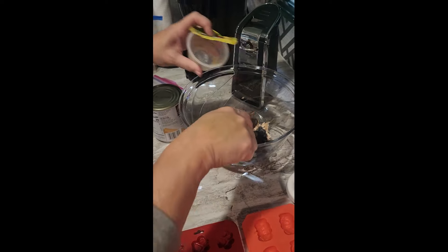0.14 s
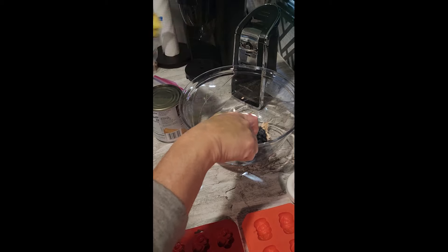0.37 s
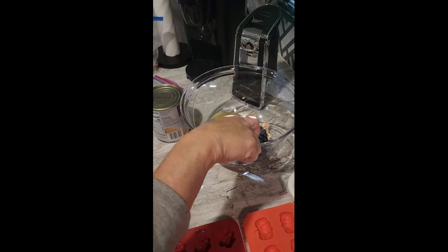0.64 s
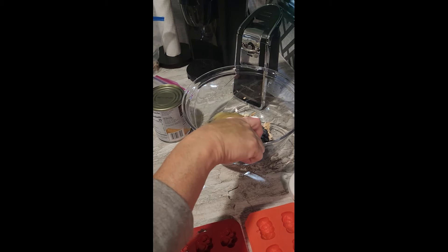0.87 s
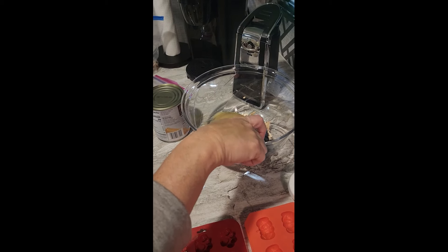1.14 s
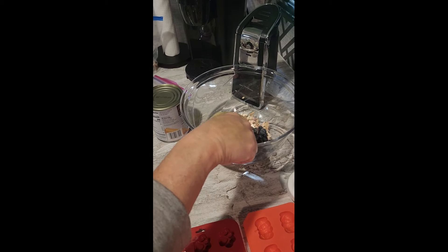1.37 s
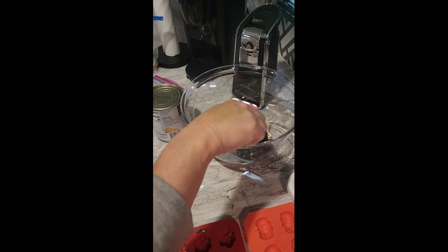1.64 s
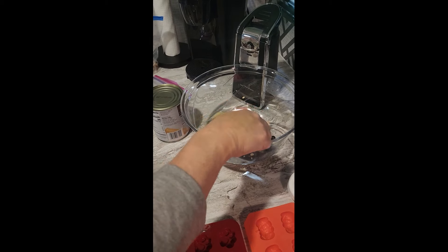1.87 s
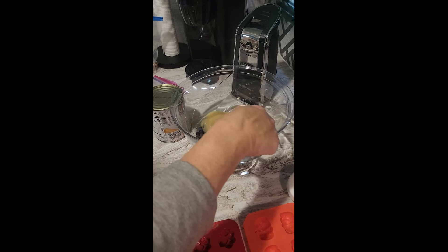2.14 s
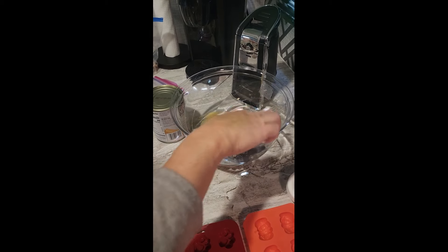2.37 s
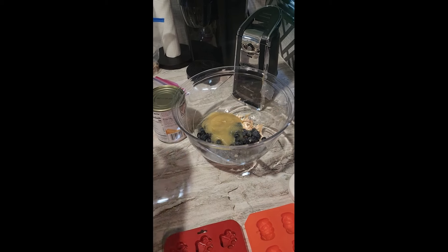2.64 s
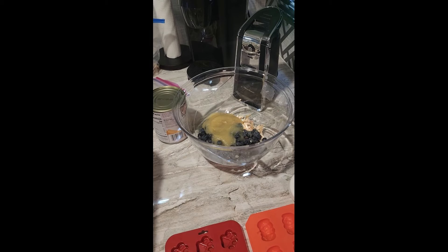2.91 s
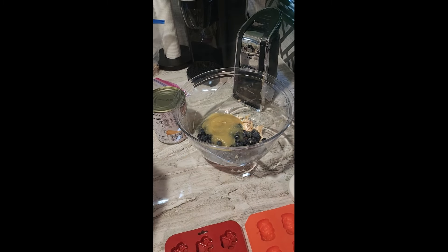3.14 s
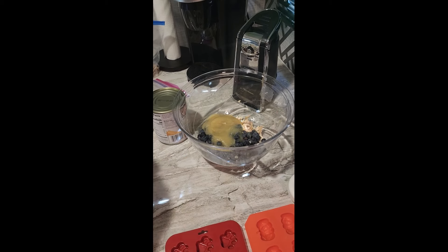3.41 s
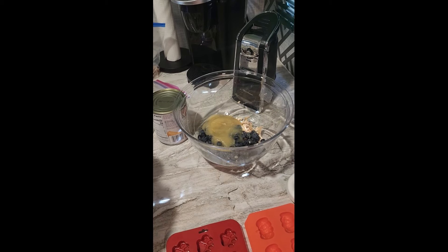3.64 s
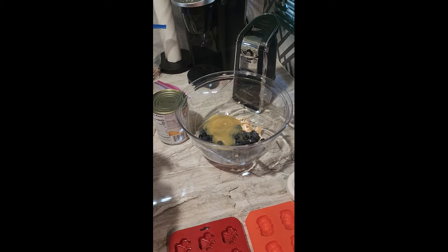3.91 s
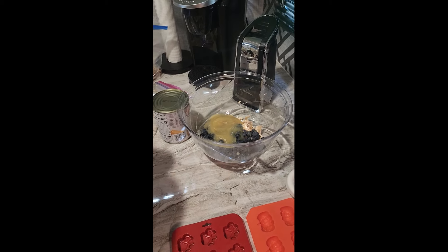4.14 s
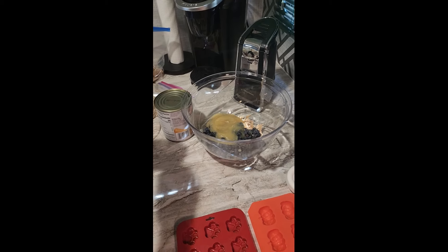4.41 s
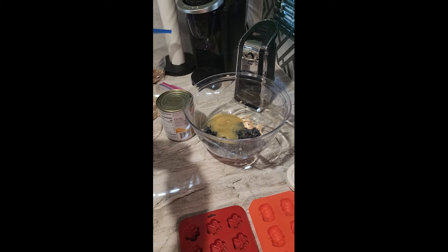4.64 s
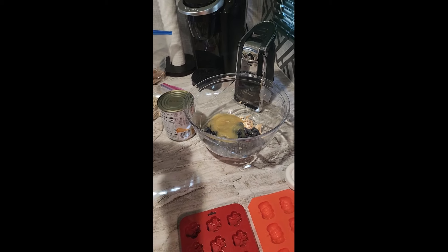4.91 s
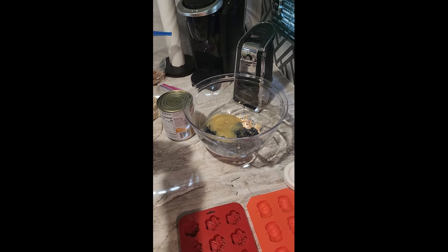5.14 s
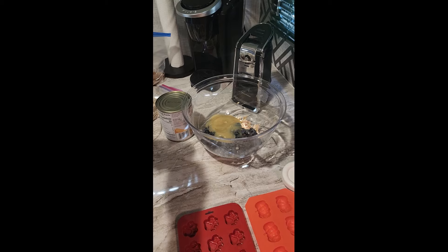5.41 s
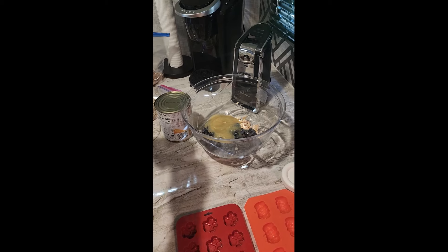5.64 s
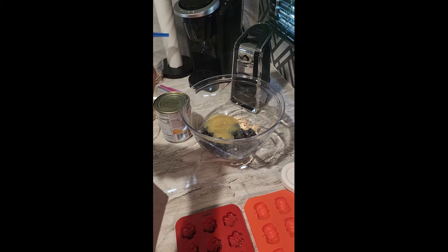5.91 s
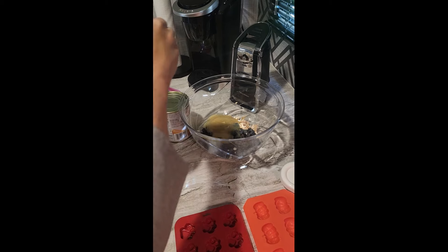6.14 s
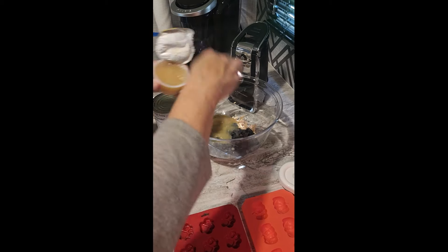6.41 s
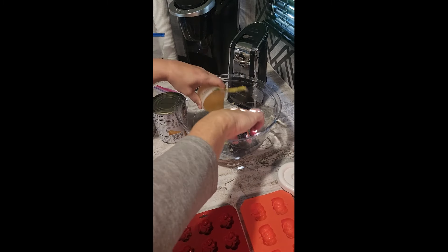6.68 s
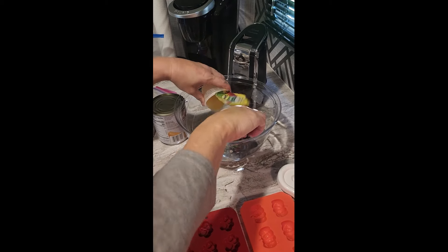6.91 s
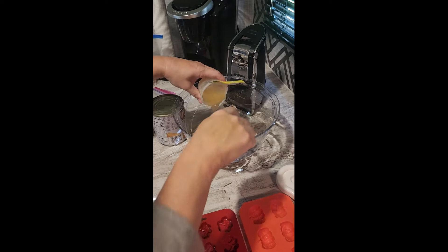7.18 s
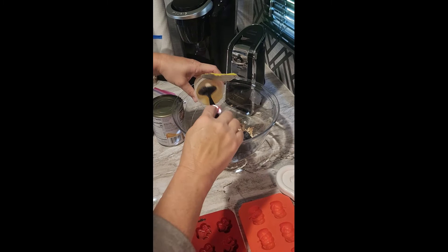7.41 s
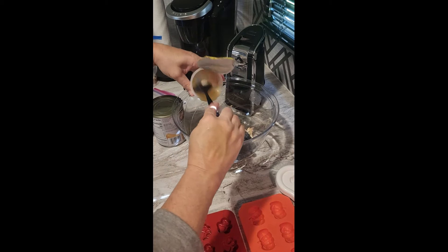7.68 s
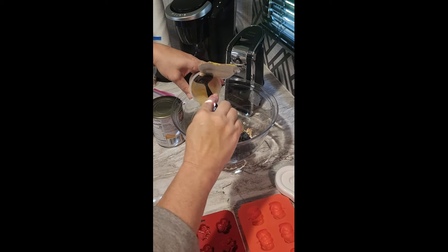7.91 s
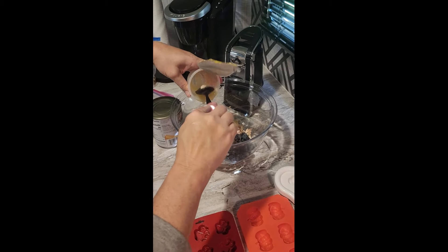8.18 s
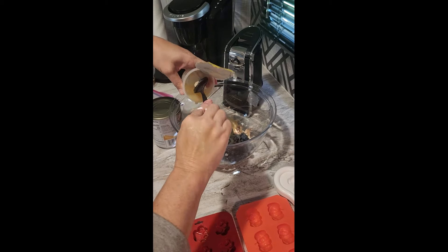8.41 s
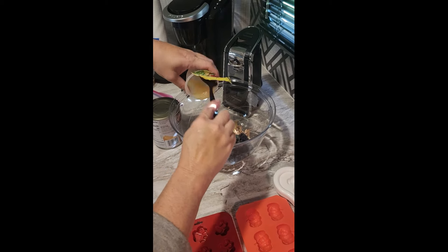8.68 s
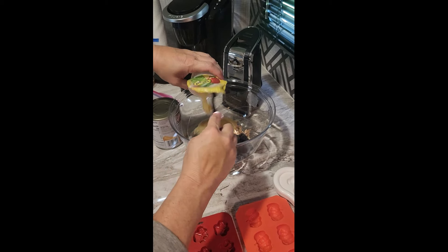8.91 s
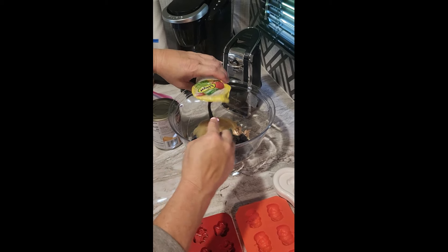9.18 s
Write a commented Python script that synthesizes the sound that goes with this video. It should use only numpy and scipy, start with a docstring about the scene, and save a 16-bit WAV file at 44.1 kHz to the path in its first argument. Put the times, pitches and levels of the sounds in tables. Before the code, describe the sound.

Close, dry kitchen sound from a phone on the counter side. A light plastic cup is knocked and shoved, with clustered rattles, then bumps and rubs before a loud, sharp, ringing drop. Several nearly quiet seconds follow over a faint refrigerator drone. Thin foil ticks and crinkles, peels with small snaps, and a spoon then taps and scrapes a hollow little cup until the end.

```python
"""Cup, foil and spoon in a quiet kitchen

A phone hears an empty plastic cup shoved about and dropped among other things (force bursts and rough
swells of noise exciting resonant bodies); the foil lid of a second cup crinkles and peels, then a spoon
knocks on that cup and scrapes it out, its air singing. Damped sines add short single notes and a ringing
blow. A refrigerator drones as shaped noise; hard walls answer quickly with decaying noise echoes."""
import sys
import numpy as np
from scipy import signal
from scipy.fft import rfft, irfft, next_fast_len
from scipy.io import wavfile
from scipy.ndimage import uniform_filter1d, map_coordinates

SR = 44100
rng = np.random.default_rng(int(sys.argv[2]) if len(sys.argv) > 2 else 0)


def invert_db(level):
    """Linear amplitude ratio for a level in decibels (20 dB per decade), elementwise."""
    return 10 ** (np.asarray(level, dtype=float) / 20)


def bounce(signal):
    """Save signal as a 16-bit WAV file at the path given by the first command-line argument."""
    frames = np.transpose(np.atleast_2d(signal))
    limited = np.clip(frames, -1, 1)
    pcm = np.round(limited * 32767).astype(np.int16)
    wavfile.write(sys.argv[1], SR, pcm)


N = 410130  # length [samples]

# Knocks, before trims: (time [s], click level [dB], weight: thud re click [dB], snap re click [dB],
# rattling note [Hz])
CLATTER_KNOCKS = [(0.275, -59.5, 3, -30, 1270), (0.3056, -55, 4, -10, 1460), (0.3736, -36, -4.5, -5, 990),
                  (0.4027, -36.5, -12, -28, 830), (0.418, -27, -14.5, -15, 974),
                  (0.4428, -23.5, -13, -16.5, 511), (0.4934, -25, -10.5, -23.5, 626),
                  (0.5149, -26.5, -13.5, -18.5, 1644), (0.5586, -37.5, -7, -12.5, 905),
                  (0.5765, -26.5, -13, -12, 680), (0.607, -42.5, -2.5, -6.5, 496),
                  (0.636, -27, -14, -6, 598), (0.8994, -34.5, -36, 2, 1317), (1.1319, -41, -1.5, -3, 543),
                  (1.1744, -49.5, -3.5, -17, 585), (1.2044, -40, -3.5, -12, 540),
                  (1.2344, -44, -1, -9.5, 560), (1.257, -32, -4, -16, 916), (1.5201, -21, -3, -22.5, 982),
                  (1.5724, -45.5, 15, -3.5, 1196), (1.5969, -41, 1.5, -19, 1250),
                  (1.8796, -21, -12.5, -33, 2286), (1.9754, -27.5, -26, -43, 2296),
                  (2.2263, -23, -7, -10, 2344), (2.3222, -14.5, -8, -16, 1580),
                  (2.4115, -7, -11.5, -12.5, 1906), (2.423, -5, -16.5, -12, 1113)]
# Knocks of the foil lid: (time [s], click level [dB], weight [dB], snap [dB], rattling note [Hz])
FOIL_KNOCKS = [(2.7801, -65.5, 1.5, -2.5, 2260), (3.1999, -70, -5.5, 6, 7390), (3.2594, -76, 1.5, 14, 7600),
               (3.3792, -68, -15, 9, 6640), (4.5998, -65, -2, -5, 6620), (4.7398, -50.5, -15, -24, 3240),
               (4.9294, -60.5, -8, -2, 2200), (5.0694, -66.5, -1, -10.5, 3450),
               (5.2235, -47, -10, -22, 2280), (5.3577, -50, -5, -23, 2630), (5.4798, -53, -11, -17.5, 2410),
               (5.4993, -52, -9.5, -10, 2370), (5.6014, -56, -11, -11.5, 2400),
               (5.6306, -56, -6, -22.5, 2370), (5.803, -38.5, -30, -26, 2420), (6.4115, -48, -2, -5, 2980),
               (6.8137, -36, -22, 5, 6450), (6.869, -59, 2, -9, 6400), (6.9148, -54.5, -2, -7, 2250),
               (7.0344, -30.5, -15, -17.5, 3110), (7.1187, -46.5, -15, -19.5, 2140),
               (7.2555, -49.5, 0, -22, 2124)]
# Knocks of the spoon: (time [s], click level [dB], weight [dB], snap [dB], rattling note [Hz])
SPOON_KNOCKS = [(7.5504, -26.5, -26.5, -7.5, 1341), (7.5746, -43, -7, -4, 1330),
                (7.6531, -44.5, 0.5, -20, 635), (7.7353, -40, -12.5, -13, 1360),
                (7.8142, -39.5, -19, -6, 1585), (7.9487, -24, -24.5, -1, 1305),
                (7.9727, -31.5, -14, -18, 1380), (8.0617, -40.5, -23, -6.5, 3640),
                (8.3571, -40.5, -16, -4, 3060), (8.4141, -32, -18, -13, 1580),
                (8.4838, -37.5, -8.5, -7, 1290), (8.542, -41.5, -7.5, 0, 1350),
                (8.7186, -27.5, -20, 0, 1580), (8.751, -34.5, -15, -14, 1590), (8.8014, -50, 4, -8, 1630),
                (9.0507, -20, -21, -0.5, 3256), (9.0885, -34.5, -7, -4, 1476), (9.2123, -42.5, -6, 0, 1472)]
# Rubbing strokes and the rough tails of knocks: (time of peak [s], fade [s], body level [dB],
# weight: rumble re body [dB], grit: hiss re body [dB])
CLATTER_SWELLS = [(.41, 0.025, -39.5, -16, -10.5), (.455, 0.013, -47.5, 3, -6.5),
                  (.485, .012, -47.5, 2, -18), (.525, 0.016, -46, -7, -6.5), (.556, 0.0087, -42, -17, -8),
                  (.597, 0.026, -32, -9.5, -13), (.65, 0.0086, -43.5, 2.5, -5.5),
                  (.87, 0.017, -58, -15.5, -8), (.908, 0.046, -50.5, -18, -2.5),
                  (1.16, 0.02, -48.5, -10, -21), (1.205, 0.035, -47.5, -9, -17),
                  (1.25, 0.036, -45, -7, -31), (1.275, 0.0084, -38, -3.5, -36), (1.476, 0.017, -61, -9, 0),
                  (1.505, 0.0098, -49, 4.5, -18.5), (1.54, 0.0093, -28, -20, -26),
                  (1.572, 0.0099, -44.5, 8.5, -39), (1.602, 0.031, -46.5, -1.5, -17),
                  (1.9, .018, -58, 23, 4), (1.954, 0.014, -61.5, 24.5, 6), (1.99, 0.062, -54, 10, -7.5),
                  (2.075, 0.033, -41, 12, -15.5), (2.13, 0.043, -42, 9, -15), (2.18, 0.04, -45.5, 15, -12),
                  (2.24, 0.019, -35.5, 8, -11), (2.29, 0.034, -48.5, 12, -9), (2.34, 0.013, -38, 2.5, -11)]
# Strokes and rough tails of the foil: (time of peak [s], fade [s], body level [dB], weight [dB], grit [dB])
FOIL_SWELLS = [(.075, 0.031, -73.5, -3.5, 8.5), (3.2, 0.038, -85, 0, 11.5), (3.258, 0.0087, -78.5, 3, 22),
               (3.354, 0.018, -78, 3, 17), (3.86, 0.052, -73.5, 1.5, -1.5), (4.6, 0.019, -80.5, -8, 1),
               (4.93, .018, -73, -6, 3.5), (5.23, 0.018, -71, -4, -2), (5.5, 0.026, -70, -14, -3),
               (5.802, 0.0062, -52, -20, -9), (5.89, .03, -34.5, -18, -7.5), (6.105, 0.031, -67.5, -12, -4),
               (6.165, 0.018, -58.5, 4, -4), (6.2, 0.026, -49.5, 3.5, -1), (6.245, 0.026, -58.5, -18, -1),
               (6.418, .012, -49.5, -4.5, -11), (6.455, .015, -72, 5, 1), (6.832, 0.018, -60.5, -10, 12),
               (6.945, 0.016, -53.5, -6, -5.5), (7.062, 0.015, -61, -13, -5), (7.11, 0.046, -81.5, 27.5, 1),
               (7.255, 0.043, -74, 13.5, -6)]
# Strokes and rough tails of the spoon: (time of peak [s], fade [s], body level [dB], weight [dB], grit [dB])
SPOON_SWELLS = [(7.6, 0.055, -62.5, -16.5, 3), (7.665, 0.021, -56, 3.5, -13),
                (7.745, 0.011, -59, -7.5, -12), (7.762, 0.026, -61.5, -11, 11),
                (7.793, .02, -47.5, -17, -1.5), (7.823, 0.013, -49.5, -11, -4),
                (7.943, 0.0053, -55, -12, 6), (7.986, 0.021, -50, -12.5, 4.5),
                (8.085, 0.035, -67, -4.5, 8.5), (8.167, 0.0097, -53, -15, 12),
                (8.2, 0.014, -45.5, -8.5, 2.5), (8.37, .014, -60, -13, 4), (8.43, 0.029, -61, -6.5, -1),
                (8.462, 0.013, -66, -11, 8), (8.484, 0.018, -58, 4.5, 13.5), (8.555, 0.014, -45, -10, 1),
                (8.59, 0.0217, -55.5, -7, -1), (8.62, 0.012, -57.5, -6, 5.5),
                (8.77, 0.0055, -47, -21.5, -8), (8.806, 0.024, -47.5, -7, 0), (8.87, 0.061, -53, -4.5, 3.5),
                (8.922, 0.034, -49.5, -5, -6.5), (9.043, 0.0058, -46.5, -10, -4),
                (9.11, 0.0083, -50, -17, 7), (9.162, 0.019, -41, -17, 3), (9.224, 0.016, -47, -23, 1.5),
                (9.26, 0.037, -49.5, -18, 0)]
# Broad colour of the empty cup and what it meets: (frequency [Hz], relative level [dB])
CLATTER_COLOUR = [(29, -33), (50, 5.5), (203, -3), (271, 2), (380, -15), (507, -14.5), (1020, -13),
                  (1400, -15), (1870, -11), (4140, -19), (8970, -33.5), (12000, -29), (16000, -33)]
# Broad colour of the foil: (frequency [Hz], relative level [dB])
FOIL_COLOUR = [(59, -49), (100, -15.5), (461, -14), (558, -15.5), (768, -12), (1450, -14.5), (2270, -10),
               (7610, -18), (9210, -36.5), (11900, -19), (16000, -30.5)]
# Broad colour of spoon and cup: (frequency [Hz], relative level [dB])
SPOON_COLOUR = [(59, -34), (100, 2.5), (415, -8.5), (621, -8.5), (801, -15), (1520, -2), (1870, -7),
                (3320, -7.5), (4670, -12), (7610, -5), (9020, -23.5), (12400, -10.5), (16000, -23.5)]
# Resonances of the empty cup and what it meets: (frequency [Hz], width [Hz], level re colour [dB])
CLATTER_MODES = [(120, 13, 11), (302, 56, 5.5), (512, 29, 10), (700, 86, -2.5), (900, 68, 2.5),
                 (974, 13, 4), (1228.6, 110, 3.5), (1717, 21, 1.5), (1930, 21, -4), (2370, 130, 1.5),
                 (3756, 60, 9.5), (4160, 28, -1)]
# Resonances of the foil: (frequency [Hz], width [Hz], level re colour [dB])
FOIL_MODES = [(3376, 1000, 4.6), (6200, 250, 0.5)]
# Resonances of spoon and cup: (frequency [Hz], width [Hz], level re colour [dB])
SPOON_MODES = [(590, 70, 7), (1360, 90, 5), (1580, 207, 6.46), (3371, 86, 3.7), (3760, 170, 7),
               (5480, 59, 1.6), (6460, 140, 5), (8284, 150, 2.8), (12420, 400, 6.2)]
# Broad colour of the refrigerator: (frequency [Hz], relative level [dB])
DRONE = [(12, -58.5), (20, -26), (70, 1), (83, -6), (98, -25.5), (146, -13), (172, -37), (301, -26.5),
         (377, -33), (472, -29), (1370, -31.5), (1960, -25.5), (2320, -37), (7520, -49), (16000, -59)]
# Resonances of the refrigerator: (frequency [Hz], width [Hz], level re colour [dB])
DRONE_MODES = [(59, 90, -5.5), (69.6, 9.7, -1.5), (130, 23, 3), (320.4, 74, 5.5), (824, 79, 7),
               (2050, 430, 4), (7680, 1000, 8), (10400, 2400, -19), (11600, 2200, 11.5)]
# Left-right correlation of the drone: (frequency [Hz], correlation [-1 to 1])
ALIKE = [(60, 0.99), (180, 0.83), (550, 0.18), (1650, -0.18), (4970, 0.04), (15000, 0.87)]
# Decay of the kitchen's echoes: (frequency [Hz], t60 [s])
KITCHEN = [(100, 0.16), (500, 0.29), (2000, 0.24), (6000, 0.22), (14000, 0.12)]
# Direct sound of the clatter at the two ports: (frequency [Hz], left re right [dB])
CLATTER_PORTS = [(60, 0), (180, 2), (550, 2.5), (1650, -4.5), (4970, -2), (15000, -4.5)]
# Direct sound of the spoon at the two ports: (frequency [Hz], left re right [dB])
SPOON_PORTS = [(60, -4), (180, 2), (550, 5), (1650, -5.5), (4970, 1.5), (15000, -15)]
# Direct sound of the foil at the two ports: (frequency [Hz], left re right [dB])
FOIL_PORTS = [(60, -11), (240, 8.5), (950, 8), (3770, -4), (15000, -9)]
# Short single notes: bumps, squeaks and the ringing or thump of knocks:
# (time [s], level [dB], frequency [Hz], t60 [s])
NOTES = [(.275, -43, 1286, 0.12), (.305, -39.5, 1390, 0.12), (.418, -24, 3530, 0.059),
         (.517, -22.5, 3480, 0.076), (.561, -32, 3430, .05), (1.132, -34, 561, 0.098),
         (1.175, -30.5, 608, 0.094), (1.572, -24, 130, 0.056), (6.72, -54, 110.3, 0.16),
         (1.881, -21.5, 160, 0.061), (6.868, -55.5, 1150, 0.059), (6.918, -56, 4750, .05),
         (6.9535, -29.5, 1570, 0.0078), (6.956, -32, 132, 0.047), (7.086, -34, 139, 0.045),
         (7.115, -36.5, 150, 0.1), (7.225, -33.5, 110.3, 0.038), (7.245, -37, 124, 0.11),
         (8.92, -57, 1485, 0.14), (9.24, -60, 1515, 0.16)]
# What the hardest blow leaves ringing: (frequency [Hz], level re DROP_DB [dB], t60 [s])
DROP_RING = [(511, -1.5, 0.23), (802, -22.5, 0.53), (904, -8, 0.15), (993.6, -16, 0.22), (1716, 1, 0.23),
             (2076, -4, 0.13), (2351, -5, 0.18), (3187, -12, 0.13), (3540, -16, 0.14)]
# One dry tap: (time [s], level [dB], frequency [Hz], t60 [s])
TAP = (6.9535, -27, 520, .009)
# Air note of the cup as it is tipped: (time [s], frequency [Hz])
CUP_AIR = [(8.1, 1350), (8.45, 1530), (9.3, 1480)]

DRONE_DB = -55  # mean level of the drone [dB]
DROP_S, DROP_DB = 2.413, -19  # hardest blow: time [s], reference level of its ring [dB]
BOOM_HZ, EARLY_CUT = 192, 0.67  # the early clatter leaves out this share of the boom below this pitch [Hz]
HEAVY_FROM_S = 1.42  # from here the weight comes onto the counter [s]
ROUNDNESS, RISE_SHARE = 1.42, 0.9  # bluntness of a swell's top; its rise time over its fade time


def unit(x):
    """Normalisation: x scaled to rms 1."""
    return x / np.sqrt(np.mean(x ** 2) + 1e-20)


def along(points, hz):
    """Logarithmic pitch axis: (frequency, value) points interpolated in log frequency."""
    f, v = np.transpose(points)
    return np.interp(np.log(hz + 1), np.log(f + 1), v)


def wobble(rate):
    """Slow random modulation: a smooth curve through rate random knots a second."""
    knots = rng.standard_normal(int(N * rate / SR) + 4)
    return map_coordinates(knots, [np.arange(N) * rate / SR])


def body(colour, modes, hz):
    """Resonance: the gain of an object is its broad colour with a hump at each mode."""
    humps = sum(db / (1 + (2 * (hz - centre) / width) ** 2) for centre, width, db in modes)
    return invert_db(along(colour, hz) + humps)


def causal(gain):
    """Causality: a minimum-phase response with this gain, so nothing sounds before the blow."""
    cepstrum = irfft(np.log(gain + 1e-6))
    half = len(cepstrum) // 2
    cepstrum[1:half] *= 2
    cepstrum[half + 1:] = 0
    return np.exp(rfft(cepstrum))


def filtered(x, response):
    """Linear filtering: the spectrum of x times a response of frequency."""
    m = 2 * next_fast_len(N // 2 + 8192)
    return irfft(rfft(x, m) * response(np.fft.rfftfreq(m, 1 / SR)), m)[..., :N]


def registers(forces, colour, modes, edges_hz):
    """Superposition: four forces, low to high, each sound their own register of the object."""
    def response(hz):
        below = [1 / (1 + (hz / edge) ** 6) for edge in edges_hz]
        shares = np.diff([0 * hz, *below, 1 + 0 * hz], axis=0)
        return [causal(unit(part)) for part in body(colour, modes, hz) * shares]
    return filtered(forces, response).sum(0)


def blows(knocks, trim_db, hollow_share, t60s, harder, ring_db, ring_t60):
    """Impact: a dying force burst, its life set by its level; the spot struck rattles on one note."""
    forces, ring = np.zeros((4, N + SR)), np.zeros(N + SR)
    t = np.arange(SR // 3) / SR
    for s, db, weight_db, snap_db, hz in knocks:
        at = slice(round(s * SR), round(s * SR) + len(t))
        # thud, hollow, click and snap: one level for each register
        levels = db + np.add([weight_db, hollow_share * weight_db, 0, snap_db], trim_db)[:, None]
        lives = np.array(t60s)[:, None] * invert_db(harder * (levels + 28.0))  # t60s hold at -28 dB
        attack = 1 - np.exp(-t / 0.00047)
        burst = rng.standard_normal((4, len(t))) * attack
        crack = invert_db(4.0 - 60 * t / 0.0054)  # the first touch is the sharpest
        forces[:, at] += invert_db(levels) * (invert_db(-60 * t / lives) + crack) * burst
        drift = np.cumsum(rng.standard_normal(len(t))) * .04 * (1 + hz / 2000)  # higher notes rattle more
        decay = invert_db(levels[1:].max() + ring_db - 60 * t / ring_t60)
        ring[at] += decay * np.sin(2 * np.pi * hz * t + drift)
    return forces[:, :N], ring[:N]


def rough_swells(swells, rasp_db, rasp_share, grain_db, judder_db):
    """Stick-slip roughness: strokes and knock tails swell and fade as uneven grains of noise."""
    pressure = np.zeros((4, N + SR))
    t = np.arange(-SR // 4, SR // 4) / SR
    for s, fade_s, db, weight_db, grit_db in swells:
        side_s = fade_s * np.where(t < 0, RISE_SHARE, 1)
        swell = np.exp(-np.abs(t / side_s) ** ROUNDNESS)
        # rumble, body, rasp and hiss: one level for each register; the rasp follows the grit
        levels = db + np.array([[weight_db], [0], [rasp_db + rasp_share * grit_db], [grit_db]])
        pressure[:, round(s * SR):][:, :len(t)] += invert_db(levels) * swell
    grains = invert_db(grain_db * wobble(400) + judder_db * wobble(45))
    grains = grains * invert_db(np.outer([1.5, .8, 0, 0], wobble(25)))  # the low registers come in lumps
    return pressure[:, SR // 4:][:, :N] * unit(grains * rng.standard_normal((4, N)))


def hollow(force, centre_hz, sway_hz, width_hz, db):
    """Cavity resonance: air in a cup sings under the force, wavering as its mouth is more or less covered."""
    slow = filtered(force, lambda hz: 1 / (1 + 1j * hz / width_hz)) * np.sqrt(SR / width_hz / np.pi)
    pitch_hz = centre_hz + sway_hz * wobble(11)
    return invert_db(db) * slow * np.sin(2 * np.pi * np.cumsum(pitch_hz) / SR)


def kitchen(x):
    """Reverberation: counter echoes, then walls; the random echo pattern is redrawn three times a second."""
    wet, step = np.zeros((2, N + SR)), SR // 3
    for start in range(0, N, step):
        hz, t, z = signal.stft(rng.standard_normal((2, step)), SR, nperseg=256)
        walls = invert_db(-60 * t / along(KITCHEN, hz)[:, None])  # each frequency dies at its own speed
        counter = invert_db(11.5 - 60 * t / 0.032)
        tail = signal.istft(z * (walls + counter), SR, nperseg=256)[1]
        tail = tail / np.linalg.norm(tail[0])
        echo = signal.fftconvolve(x[None, start:start + step], tail, axes=1)
        wet[:, start + 60:][:, :echo.shape[1]] += echo  # echoes start 60 samples late
    return wet[:, :N]


def placed(x, balance, lead_s, room_db):
    """Stereo cues: the two ports differ in level and time; the room is alike at both in the bass."""
    side = np.array([[.5], [-.5]])
    direct = filtered(x, lambda hz: invert_db(along(balance, hz) * side) * np.exp(2j * np.pi * hz * lead_s * side))
    left, right = kitchen(x)
    apart = filtered(left - right, lambda hz: hz ** 2 / (hz ** 2 + 300 ** 2))
    return direct + invert_db(room_db) * ((left + right) / 2 + side * apart)


def refrigerator():
    """Partly coherent noise: motor hum and fan rush, nearly alike at both ports in the bass."""
    def shape(hz):
        angle = np.arccos(np.clip(along(ALIKE, hz), -1, 1)) / 2
        return body(DRONE, DRONE_MODES, hz) * [np.cos(angle), np.sin(angle)]
    mid, side = filtered(rng.standard_normal((2, N)), shape)
    return invert_db(DRONE_DB + 0.43 * wobble(0.9)) * unit(np.array([mid + side, mid - side]))


def foil():
    """Impact and friction on a thin sheet: the lid crinkles in the fingers, then tears off the rim."""
    forces, ring = blows(FOIL_KNOCKS, trim_db=[-14.0, 4, -9.0, 4], hollow_share=0.6,
                         t60s=[0.15, 0.014, 0.037, 0.0295], harder=-0.039, ring_db=-9, ring_t60=.04)
    forces = forces + rough_swells(FOIL_SWELLS, rasp_db=-1.5, rasp_share=0.35, grain_db=1.5, judder_db=2.0)
    sound = ring + registers(forces, FOIL_COLOUR, FOIL_MODES, edges_hz=[600, 2200, 7000])
    return placed(sound, FOIL_PORTS, lead_s=-.0003, room_db=1.5)


def clatter():
    """Impact, friction and cavity resonance: the empty cup shoved over and dropped on hollow things."""
    forces, ring = blows(CLATTER_KNOCKS, trim_db=[2.0, 4, -7, 0.0], hollow_share=0.63,
                         t60s=[0.066, 0.033, .07, 0.048], harder=0.15, ring_db=-2.5, ring_t60=.09)
    rough = rough_swells(CLATTER_SWELLS, rasp_db=4, rasp_share=.9, grain_db=2.5, judder_db=2.5)
    heavy = np.arange(N) / SR > HEAVY_FROM_S
    ring = ring + hollow(rough[1] * heavy, centre_hz=1250, sway_hz=150, width_hz=180, db=-2.0)
    sound = ring + registers(forces + rough, CLATTER_COLOUR, CLATTER_MODES, edges_hz=[480, 1800, 4500])
    boom = filtered(sound, lambda hz: 1 / (1 + (hz / BOOM_HZ) ** 6))
    sound = sound - boom * ~heavy * EARLY_CUT
    return placed(sound, CLATTER_PORTS, lead_s=0.00016, room_db=0.5)


def notes():
    """Damped oscillation: each short note is a quickly dying swing, rattling more the higher it is."""
    sound, t = np.zeros(N + SR), np.arange(SR // 4) / SR
    ringing = [(DROP_S, DROP_DB + db, hz, t60) for hz, db, t60 in DROP_RING]
    for rows, rattle in ((NOTES + [TAP], .1), (ringing, .02)):
        for s, db, hz, t60 in rows:
            drift = np.cumsum(rng.standard_normal(len(t))) * rattle * hz / 3500
            swing = invert_db(db - 60 * t / t60) * np.sin(2 * np.pi * hz * t + drift)
            sound[round(s * SR):][:len(t)] += swing
    return placed(sound[:N], [(100, .5), (4000, -1.7)], lead_s=.0001, room_db=-12.5)


def spoon():
    """Impact, friction and cavity resonance: the spoon lands on the cup's wall and scrapes along it."""
    forces, ring = blows(SPOON_KNOCKS, trim_db=[2.2, 6.55, 3.1, 1.8], hollow_share=0.326,
                         t60s=[0.089, 0.03, 0.0295, 0.051], harder=0.078, ring_db=-7.0, ring_t60=0.088)
    forces = forces + rough_swells(SPOON_SWELLS, rasp_db=0, rasp_share=0.93, grain_db=3.0, judder_db=2.33)
    air_hz = np.interp(np.arange(N) / SR, *np.transpose(CUP_AIR))
    ring = ring + hollow(forces[1], air_hz, sway_hz=60.03, width_hz=58, db=-3)
    sound = ring + registers(forces, SPOON_COLOUR, SPOON_MODES, edges_hz=[480, 1800, 4500])
    return placed(sound, SPOON_PORTS, lead_s=.0002, room_db=-2)


def scene():
    """Superposition: everything that sounds in the kitchen adds at the two ports."""
    return refrigerator() + foil() + clatter() + notes() + spoon()


def suppressor(x, depth_db, open_db, soft_db, window_s):
    """Downward expansion: the gain sinks whenever the treble falls quiet, so tails end early."""
    treble = filtered(x, lambda hz: hz > 3500)
    power = uniform_filter1d((treble ** 2).mean(0), round(window_s * SR))
    level_db = 10 * np.log10(np.abs(power) + 1e-12)
    shut = 1 / (1.0 + np.exp(np.clip((level_db - open_db) / soft_db, -30, 30)))
    bass = filtered(x, lambda hz: 1 / (1 + (hz / 100) ** 4))  # the bass is spared
    return bass + (x - bass) * invert_db(-depth_db * shut)


def low_pass(x):
    """Removes everything above the highest recorded frequency."""
    return signal.sosfilt(signal.butter(12, 16970, fs=SR, output="sos"), x)


def record(dry):
    """Expansion, saturation, band limiting: the phone suppresses noise, rounds peaks and cuts the top."""
    quieted = suppressor(dry, depth_db=6.0, open_db=-60, soft_db=7.5, window_s=0.028)
    rounded = quieted / (1 + np.abs(quieted / .93) ** 4) ** (1 / 4)
    finished = filtered(rounded, lambda hz: 1 / (1 + (hz / 16200) ** 40))
    return low_pass(finished)


dry = scene()
out = record(dry)
bounce(out)
```